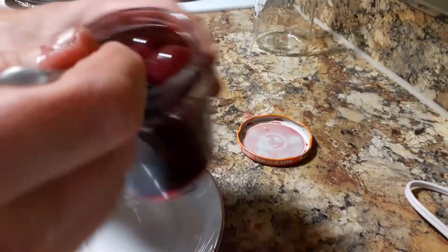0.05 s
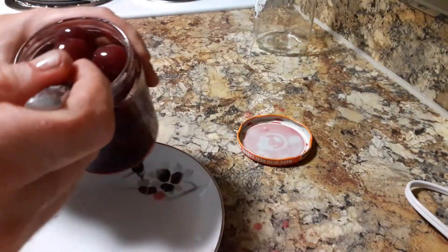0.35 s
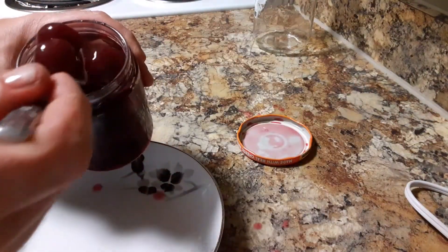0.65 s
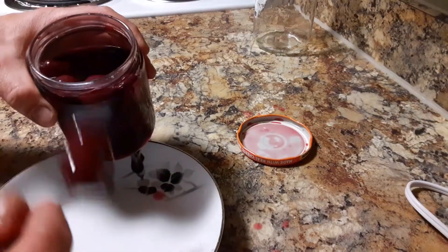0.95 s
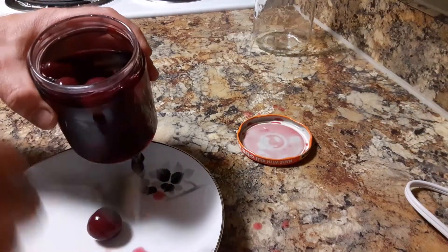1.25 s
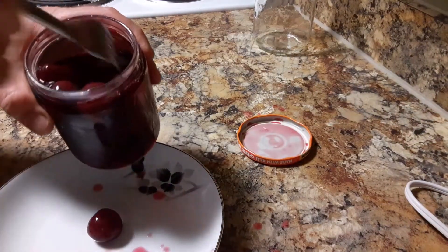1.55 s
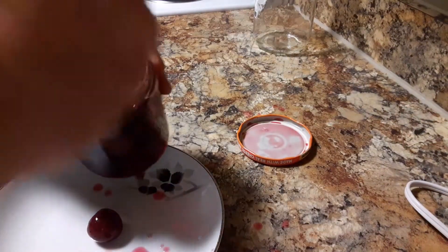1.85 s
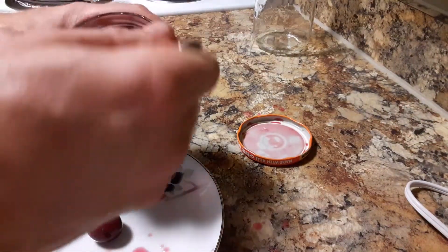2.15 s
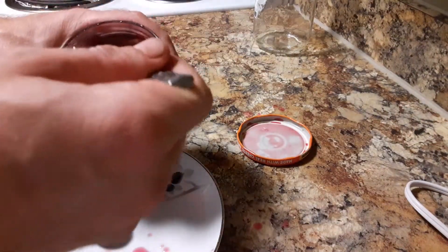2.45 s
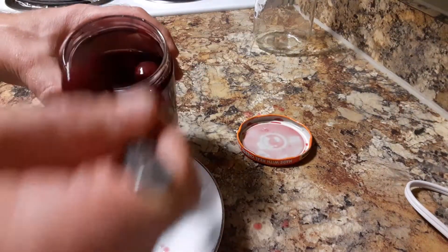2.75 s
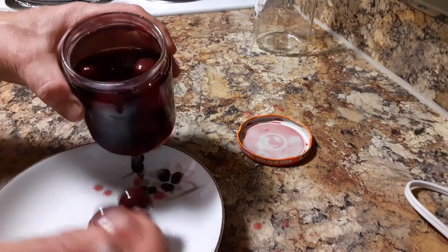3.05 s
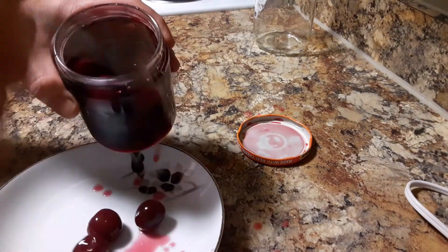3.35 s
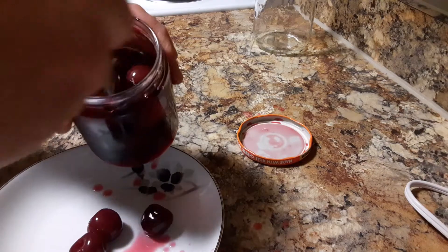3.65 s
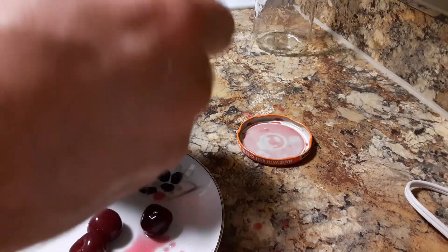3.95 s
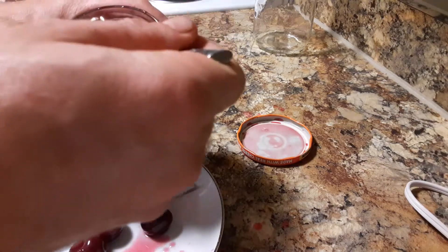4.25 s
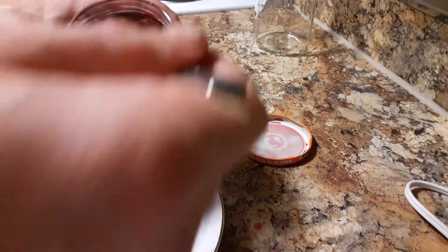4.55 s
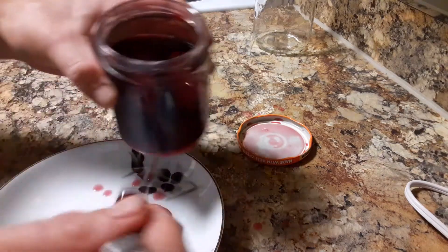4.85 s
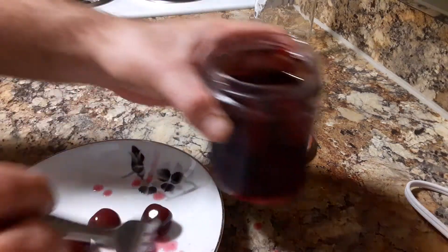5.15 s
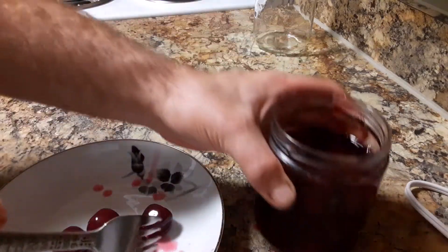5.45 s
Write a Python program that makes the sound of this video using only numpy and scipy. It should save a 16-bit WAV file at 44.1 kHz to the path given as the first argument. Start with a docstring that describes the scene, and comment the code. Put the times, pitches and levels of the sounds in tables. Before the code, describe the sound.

A quiet kitchen is heard up close, with a low hum, a fading rumble and a faint hiss that swells slightly around 0.5 seconds. At 1.1 seconds a cherry lands on a ceramic plate with a dull thud and a tiny bounce. From 1.6 to 1.9 seconds a steel fork rattles in a glass jar, making a quick run of bright, loud clinks. Faint ticks follow near 2.4 seconds. At 2.8 seconds a thin clink coincides with the jar's base knocking the plate, ringing briefly, and a softer knock comes at 3 seconds. More fruit thuds down at 3.1 seconds. The loudest clink, fork on glass, arrives at 3.6 seconds, with two light ones by 3.9. After a pause, a faint thud at 5 seconds is followed by a gentle fork tap on the plate. Each clink and knock reverberates briefly in the small, hard room.

```python
"""Serving cherries from a glass jar

Cherries are served from a hand-held jar onto a ceramic plate on a stone kitchen counter. Hard contacts
excite high modes: the steel utensil clinks in the jar, whose base knocks the plate. Soft contacts excite
mainly low ones: the fruit lands with dull thuds. A small hard room reverberates after each clink and
knock, over a low hum, a fading rumble and a faint hiss."""
import sys
import numpy as np
from scipy import signal
from scipy.fft import rfft, irfft, next_fast_len
from scipy.io import wavfile

SR = 44100
rng = np.random.default_rng(int(sys.argv[2]) if len(sys.argv) > 2 else 0)


def put_to_file(sound):
    """Save the sound as 16-bit audio at rate SR, in the file named by the first command-line argument."""
    columns = np.atleast_2d(sound).T  # one column per channel
    safe = np.clip(columns, -1, 1)
    whole_steps = np.round(safe * 32767)
    wavfile.write(sys.argv[1], SR, whole_steps.astype(np.int16))


N = 242594
LENGTH = 24576  # samples in the sound of one blow
AGE = np.arange(LENGTH) / SR  # seconds since the blow

# the jar's thick base against the plate: start_s, level_db, sharpness_db_per_octave, ring_factor, rim_db
KNOCKS = [(1.886, -48, 2, 0.059, -65.5), (2.827, -22.5, 0, 0.77, -33.5), (2.962, -34.5, 0.5, 0.55, -36.5)]
# cherries landing on the plate: start_s, thud_db, ring_db, first_flight_s, bounce_loss_db
LANDINGS = [(1.140, -32, -49.5, 0.068, 16), (3.142, -34.5, -60.5, 0.065, 11.5),
            (4.999, -44.5, -75.5, 0.13, 15)]


def amp(db):
    """Amplitude grows tenfold for every 20 dB."""
    return 10 ** (np.asarray(db) / 20)


def unit(x):
    """Normalisation to an rms of 1."""
    return x / np.sqrt(np.mean(x ** 2) + 1e-30)


def along(points, hz):
    """Interpolation of (frequency_hz, value) points on a logarithmic frequency axis."""
    knots_hz, values = np.transpose(points)
    return np.interp(np.log(hz + 1), np.log(knots_hz + 1), values)


def pan(db):
    """A level difference, left over right, gives a source its direction."""
    return amp([[db / 2], [-db / 2]])


def add(track, start_s, sound):
    """Superposition: a sound adds to the track from its start time."""
    part = track[:, round(start_s * SR):][:, :LENGTH]
    part += sound[:, :part.shape[1]]


def onset_level(x, db, size=512):
    """Normalisation of a blow by the rms level of its first samples."""
    return x * amp(db) / np.sqrt(np.mean(x[:, :size] ** 2))


def minimum_phase(spectrum):
    """Folding the cepstrum gives a causal response through (frequency_hz, level_db) points."""
    cepstrum = irfft(np.log(amp(along(spectrum, np.fft.rfftfreq(LENGTH, 1 / SR)))))
    cepstrum[1:LENGTH // 2] *= 2
    cepstrum[LENGTH // 2 + 1:] = 0
    return np.exp(rfft(cepstrum))


def diffuse_noise(spectrum, bass_hz=260):
    """A diffuse field is alike at two nearby points in the bass and almost unrelated above."""
    size = next_fast_len(N)
    hz = np.fft.rfftfreq(size, 1 / SR)
    width = np.array([np.ones_like(hz), np.hypot(.12, (hz / bass_hz) ** 2).clip(0, .9)])
    white = rfft(rng.standard_normal((2, size)))
    mid, side = irfft(white * width * amp(along(spectrum, hz)))[:, :N]
    return unit(np.array([mid + side, mid - side]))


def background(air_db=-71, attack_s=0.066, release_s=0.21):
    """Ambient noise: steady air and appliance hum, exponentially fading rumble and hiss, soft swells."""
    # spectra of room air, rumble and hiss: frequency_hz, density_db
    air_spectrum = [(20, -27), (40, -13), (60, -4.5), (200, -1.5), (400, -4), (630, -4), (1000, -10),
                    (1600, -19), (5000, -20), (6300, -32.5), (8500, -40), (11500, -16.5), (16000, -26)]
    rumble_spectrum = [(15, -61), (25, -32), (43, -10), (65, -15.5), (87, -0.5), (124, 0), (226, -13),
                       (300, -11), (438, -17), (800, -22.5), (866, -18.5), (2090, -35.5), (3000, -44),
                       (3900, -62), (6600, -120)]
    hiss_spectrum = [(1000, -29.5), (2000, -14), (3000, -8), (4800, -5), (7000, -6), (9700, -5.5),
                     (12000, -0.5), (16000, 0)]
    # appliance tones: pitch_hz, level_db
    tones = [(120, -80.5), (301, -79.5)]
    # swells of hiss: start_s, hold_s, level_db
    swells = [(0.499, 0.41, -62.5), (5.037, 0.2, -64)]
    t = np.arange(N) / SR
    hum = sum(amp(db) * np.sqrt(2) * np.sin(2 * np.pi * hz * t) for hz, db in tones)
    swelling = sum(amp(db) * np.interp(t, s + np.cumsum([0, attack_s, hold_s, release_s]), [0, 1, 1, 0])
                   for s, hold_s, db in swells)
    air = amp(air_db) * diffuse_noise(air_spectrum)
    rumble = amp(-54.5 - 5 * t) * diffuse_noise(rumble_spectrum)
    hiss = (amp(-70 - 1.95 * t) + swelling) * diffuse_noise(hiss_spectrum)
    return (air + rumble + hiss + hum) * pan(1.6)


def kitchen(near_db, tail_db, wall_t60_s=0.072, counter_t60_s=0.042, counter_db=3):
    """A room's transfer function sums direct sound, early reflections and a reverberant tail."""
    # reverberation time of the room: frequency_hz, t60_s
    reverberation = [(100, 0.81), (500, 0.6), (2000, 0.36), (5000, 0.34), (9000, 0.31), (16000, 0.25)]
    hz, t, bands = signal.stft(rng.standard_normal((2, LENGTH)), SR, nperseg=256)
    decay = amp(-60 * t / along(reverberation, hz)[:, None])
    tail = signal.istft(bands * decay, SR, nperseg=256)[1][:, :LENGTH]
    tail = unit(tail * (1 - np.exp(-AGE / 0.0026)))
    walls = unit(rng.standard_normal((2, LENGTH)) * amp(-60 * AGE / wall_t60_s))
    counter_envelope = amp(-60 * AGE / counter_t60_s) * (1 - np.exp(-AGE / 0.00033))
    counter = unit(rng.standard_normal((2, LENGTH)) * counter_envelope)
    direct = np.zeros((2, LENGTH))
    direct[0, 0] = direct[1, 6] = 1  # reaches the right channel 6 samples later
    return rfft(unit(direct) + amp(near_db) * (walls + amp(counter_db) * counter) + amp(tail_db) * tail)


def thuds(blows, rise_s=0.008, thump_db=-4, thump_rise_s=0.0094, thump_t60_s=0.36):
    """Soft contact acts as a low-pass filter: it moves only low modes, with a dull thump of noise."""
    # low modes of the counter under the plate: pitch_hz, level_db, t60_s
    modes = [(62, -4, 0.13), (119, -0.5, 0.2)]
    # spectrum of the thump: frequency_hz, density_db
    thump_spectrum = [(20, -47), (35, -30), (55, 5), (75, -2), (120, -1), (165, -3.5), (220, -10),
                      (320, -27), (700, -24), (2000, -45.5), (6000, -57)]
    body = sum(amp(db - 60 * AGE / t60_s) * np.sin(2 * np.pi * hz * AGE) for hz, db, t60_s in modes)
    body = unit(body * (1 - np.exp(-AGE / rise_s)))
    squash = amp(-60 * AGE / thump_t60_s) * (1 - np.exp(-AGE / thump_rise_s))
    track = np.zeros((2, N))
    for start_s, db in blows:
        thump = irfft(rfft(rng.standard_normal(LENGTH) * squash) * minimum_phase(thump_spectrum))
        sound = body + amp(thump_db) * unit(thump)
        add(track, start_s, onset_level(sound * pan(2.2), db, size=1536))
    return track


def counter_thuds(contacts=3, restitution=0.79, thud_db_per_db=3.3):
    """Restitution: cherries bounce ever faster and weaker. A firm knock of the jar thuds too."""
    bounces = [(s + flight_s * (1 - restitution ** k) / (1 - restitution), db - loss_db * k)
               for s, db, _, flight_s, loss_db in LANDINGS for k in range(contacts)]
    firmest_db = max(db for _, db, *_ in KNOCKS)
    knocks = [(s, firmest_db - 14 + thud_db_per_db * (db - firmest_db)) for s, db, *_ in KNOCKS]
    return thuds(bounces + knocks)


def strikes(blows, modes, clack_spectrum, clack_db, centre_hz, near_db, tail_db, pan_db, sag_per_s=0):
    """An impact excites damped modes and a broadband clack; each takes its own path through the room."""
    track = np.zeros((2, N))
    mode_hz, mode_db, mode_t60_s = np.transpose(modes)
    for start_s, db, sharpness, ring_factor in blows:
        path = kitchen(near_db, tail_db)
        # a sharp blow lifts the top modes and thins the low ones
        ring_tilt = [(centre_hz / 2, -sharpness), (centre_hz, 0), (centre_hz * 4, 2 * sharpness)]
        gains = amp(mode_db + along(ring_tilt, mode_hz))
        pitch_hz = (1 - sag_per_s * start_s) * mode_hz[:, None]
        phase = 2 * np.pi * (pitch_hz * AGE + rng.random((len(modes), 1)))
        # fingers and lingering contact shorten the ring
        decay = amp(-60 * AGE / (ring_factor * mode_t60_s[:, None]))
        partials = np.sin(phase) * decay * (1 - np.exp(-AGE / 0.000079))
        in_room = irfft(rfft(partials.astype(np.float32))[:, None] * path.astype(np.complex64))
        ring = unit(sum(gain * unit(partial) for gain, partial in zip(gains, in_room)))
        # a blunt blow gives the clack more body
        clack_tilt = [(centre_hz / 2, -sharpness), (centre_hz, 0), (centre_hz * 4, sharpness)]
        tilted = [(hz, level_db + along(clack_tilt, hz)) for hz, level_db in clack_spectrum]
        clack = unit(irfft(path * minimum_phase(tilted)))
        choke_db = -2 * np.log2(ring_factor)  # more clack for each halving of the ring
        sound = ring + amp(clack_db + choke_db) * clack
        add(track, start_s, onset_level(sound, db) * pan(pan_db))
    return track


def plate(settle_s=0.016, settle_db=-8, sag_per_s=0.0058):
    """Mass loading: the plate, rung by jar, utensil and fruit, sinks slowly in pitch as it is filled."""
    # modes of the ceramic plate: pitch_hz, level_db, t60_s
    modes = [(1490, -19.5, 0.98), (2378, -1.5, 1), (2470, -7, 0.047), (4030, -1.5, .08), (6710, -18, 0.12),
             (7860, -15.5, 0.18), (8450, -23.5, 0.089), (9560, -18.5, 0.11)]
    # spectrum of a contact with the plate: frequency_hz, density_db
    clack = [(300, -20), (2000, 8.5), (6000, -2), (16000, -3.5)]
    # the utensil comes to rest on the plate: start_s, level_db, sharpness_db_per_octave, ring_factor
    taps = [(5.116, -48, 0.5, .28)]
    # blows from jar and fruit, in the same columns
    by_jar = [(s, rim_db - 3.5, -5.5, 0.78) for s, *_, rim_db in KNOCKS]
    by_fruit = [(s, ring_db, 0, 0.24) for s, _, ring_db, _, _ in LANDINGS]
    # each cherry tips over and touches a second time
    settles = [(s + settle_s, db + settle_db, *touch) for s, db, *touch in by_fruit]
    hard = strikes(by_jar + taps, modes, clack, clack_db=-10, centre_hz=3520,
                   near_db=-1.5, tail_db=-2, pan_db=7, sag_per_s=sag_per_s)
    soft = strikes(by_fruit + settles, modes, clack, clack_db=-19, centre_hz=3520,
                   near_db=1.5, tail_db=-3, pan_db=5.5, sag_per_s=sag_per_s)
    return hard + soft


def jar_base(lift_s=0.013):
    """Contact damping: the base knocks the plate briefly; once it lifts off, the rim rings freely."""
    # modes of the jar struck on its base, and of its free rim: pitch_hz, level_db, t60_s
    base_modes = [(1060, -9.5, 0.056), (1787, -5, 0.15), (2555, -29.5, 0.2), (2600, 3, 0.06),
                  (3550, -8, 0.11), (4743, -4.5, 0.092), (5780, -11.5, 0.1), (7300, -14, 0.26),
                  (8500, -13.5, 0.14), (14300, -11.5, .09)]
    rim_modes = [(3360.3, 0, 0.33)]
    # spectrum of glass meeting ceramic: frequency_hz, density_db
    clack = [(100, -0.5), (350, 6.5), (600, 3.5), (800, 2), (1100, 4), (1400, -9.5), (2100, -3),
             (2700, -2.5), (4700, -2), (6700, -16.5), (9000, -7.5), (13000, -19), (14300, -7),
             (16000, -16.5)]
    blows = [knock[:4] for knock in KNOCKS]
    lifts = [(s + lift_s, rim_db, 0, 1) for s, *_, rim_db in KNOCKS]
    knock = strikes(blows, base_modes, clack, clack_db=-9.5, centre_hz=3380,
                    near_db=11.5, tail_db=13, pan_db=0)
    rim = strikes(lifts, rim_modes, clack, clack_db=-12, centre_hz=3380,
                  near_db=0.5, tail_db=-1.5, pan_db=-5.5)
    return knock + rim


def jar_wall():
    """Impulse excitation: the brief contact of steel on glass rings the jar's high modes."""
    # the utensil on the jar's rim and wall: start_s, level_db, sharpness_db_per_octave, ring_factor
    clinks = [(1.573, -14.5, 0.5, 0.93), (1.583, -21, 5.5, .4), (1.588, -20.5, -3, .35),
              (1.635, -29, -8, 0.16), (1.785, -16.5, -1, 0.41), (1.827, -22.5, -3.5, 0.38),
              (1.881, -25.5, 3.5, 0.14), (2.288, -58, 16, 0.045), (2.404, -40.5, 9, .05),
              (2.821, -26.5, 16.5, 0.38), (3.565, -12, -0.5, .7), (3.579, -18.5, -10, 1.28),
              (3.806, -35, -7, .25), (3.896, -40.5, -2, 0.46)]
    # modes of the glass wall: pitch_hz, level_db, t60_s
    modes = [(1542, -18, 0.073), (1655, -19, 0.084), (1790, -20, 0.077), (2150, -26, 0.04),
             (2690, -29.5, 0.11), (3358, -12, 0.16), (4410, -22.5, 0.031), (4810, -8.5, 0.06),
             (4955, 0.5, 0.15), (4867, -4, 0.12), (4970, -11, 0.05), (5260, -17.5, 0.079),
             (5540, -16.5, .12), (5950, -9, 0.12), (6085, -7, 0.083), (6380, -20, 0.15), (6595, -16, 0.15),
             (8200, -20.5, 0.05), (8307, -9, 0.06), (9000, -12, 0.09), (9360, -18.5, 0.09),
             (9929, -24, 0.1), (11236, -15, 0.02), (10760, -21, 0.09), (11170, -20, 0.13),
             (12940, -25.5, 0.05), (13200, -26, 0.055), (14300, -22, .08), (15050, -24.5, .08)]
    # spectrum of steel meeting glass: frequency_hz, density_db
    clack = [(100, -12.5), (400, -16), (700, -12), (1200, -18.5), (1600, -4), (2300, -10), (3000, -4.5),
             (4000, -19), (5400, 4.5), (7500, -1.5), (9000, -5.5), (10200, -5), (11500, -0.5),
             (16000, -8.5)]
    return strikes(clinks, modes, clack, clack_db=-11, centre_hz=5186, near_db=6.5, tail_db=5, pan_db=2)


def scene():
    """Superposition: jar, plate, counter and background add at the microphone."""
    return jar_wall() + jar_base() + plate() + counter_thuds() + background()


def record(dry, low_cut_hz=46, ceiling=0.85, top_hz=15900):
    """Band limiting and soft saturation: the recorder cuts deep bass and top treble, and the loudest peaks are
    rounded softly."""
    thinned = signal.sosfilt(signal.butter(3, low_cut_hz, "highpass", fs=SR, output="sos"), dry)
    rounded = thinned / (1 + (thinned / ceiling) ** 4) ** (1 / 4)
    size = next_fast_len(N + SR // 2)
    low_pass = 1 / (1 + (np.fft.rfftfreq(size, 1 / SR) / top_hz) ** 160)
    return irfft(rfft(rounded, size) * low_pass, size)[:, :N]


dry = scene()
out = record(dry)
put_to_file(out)
```